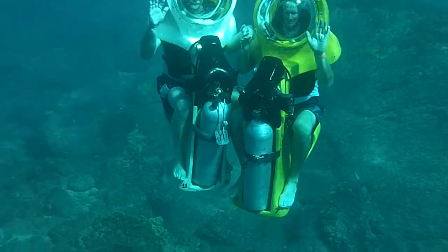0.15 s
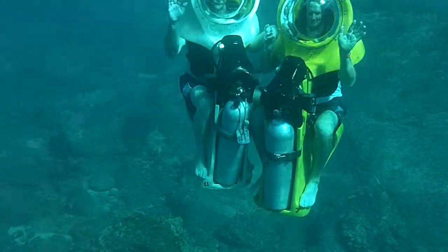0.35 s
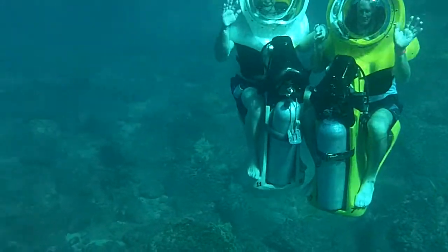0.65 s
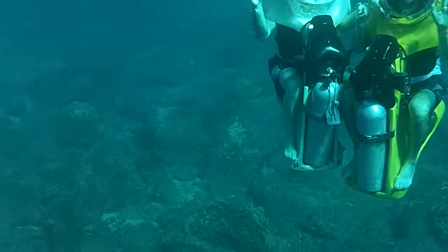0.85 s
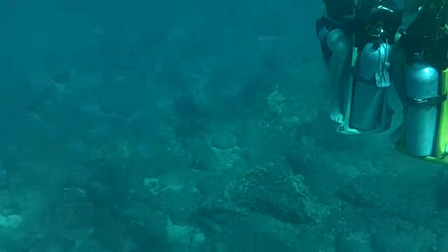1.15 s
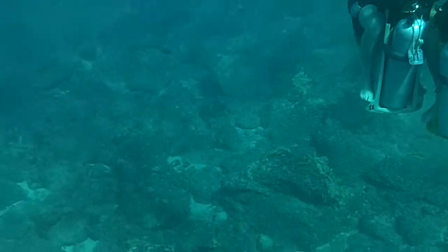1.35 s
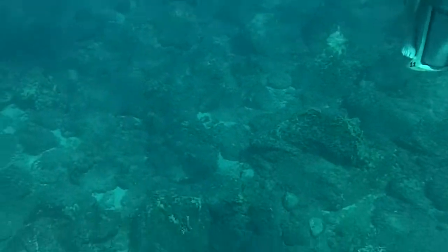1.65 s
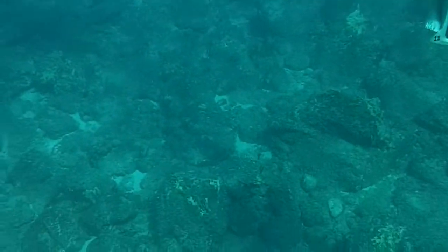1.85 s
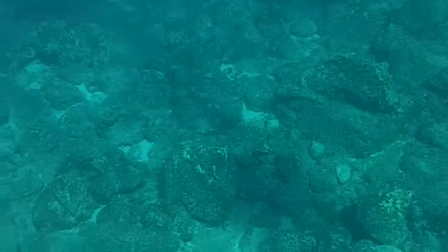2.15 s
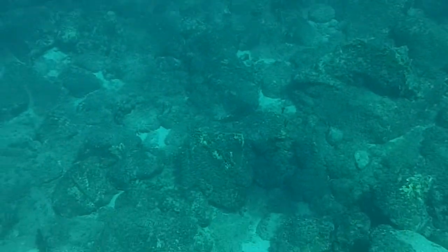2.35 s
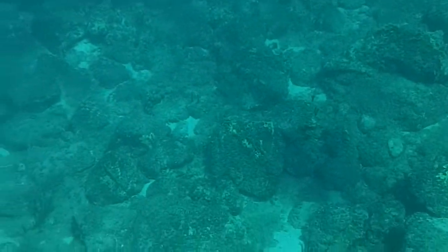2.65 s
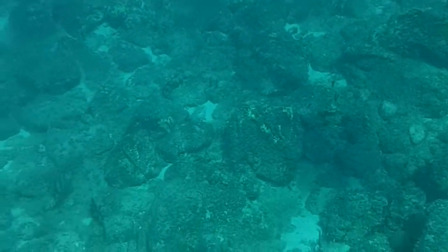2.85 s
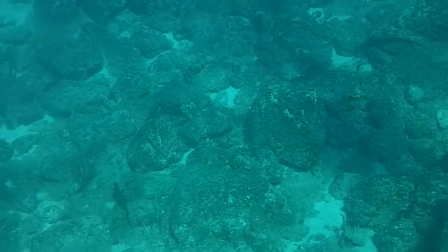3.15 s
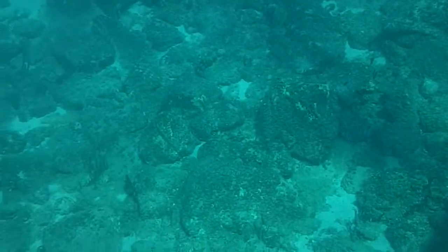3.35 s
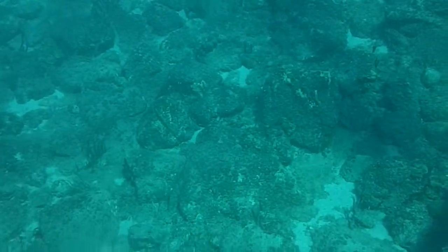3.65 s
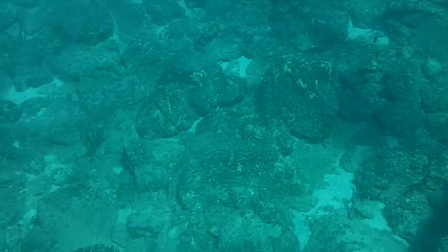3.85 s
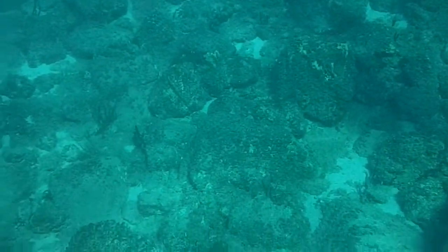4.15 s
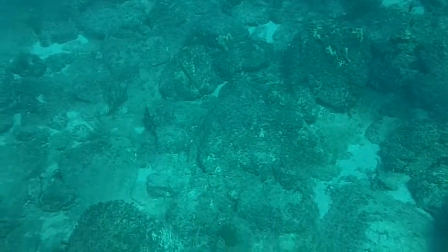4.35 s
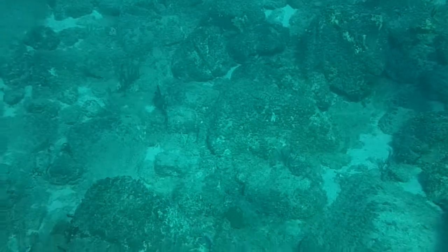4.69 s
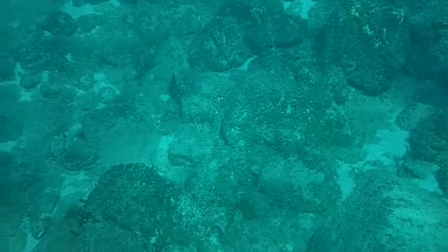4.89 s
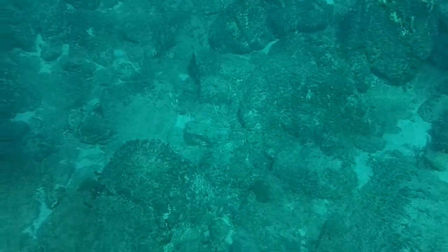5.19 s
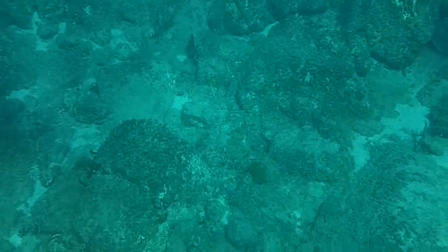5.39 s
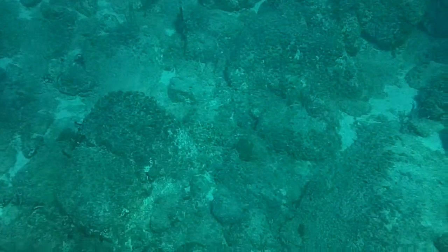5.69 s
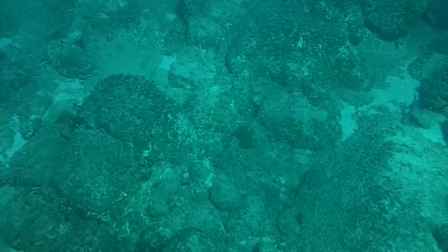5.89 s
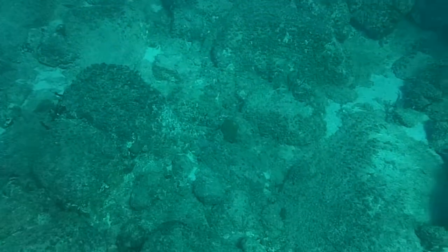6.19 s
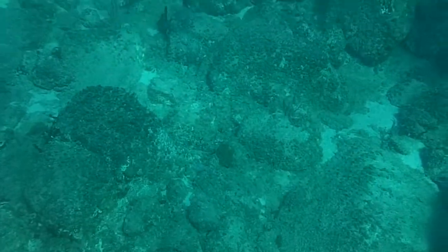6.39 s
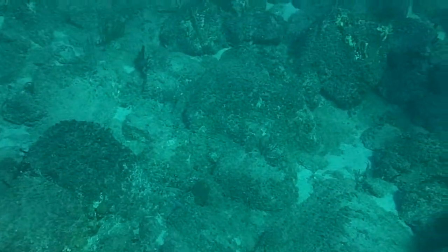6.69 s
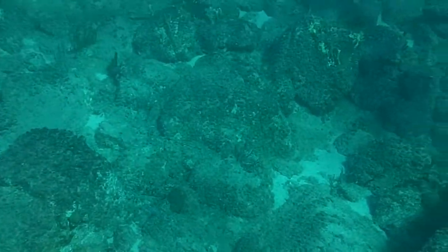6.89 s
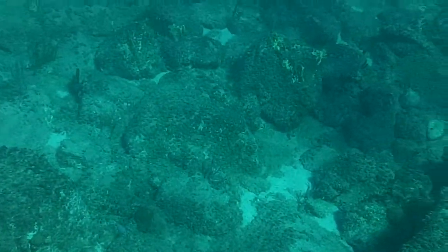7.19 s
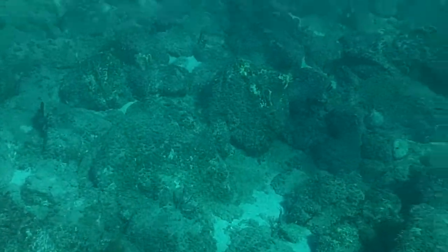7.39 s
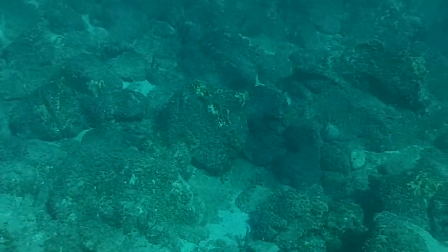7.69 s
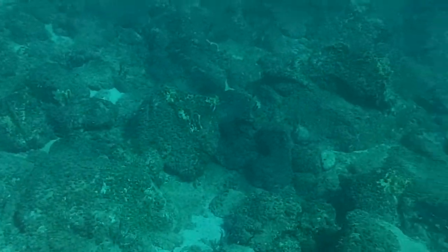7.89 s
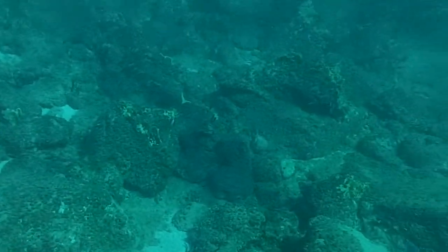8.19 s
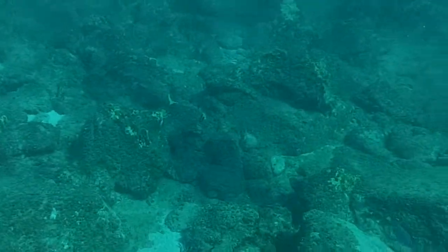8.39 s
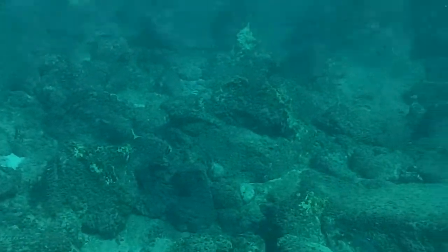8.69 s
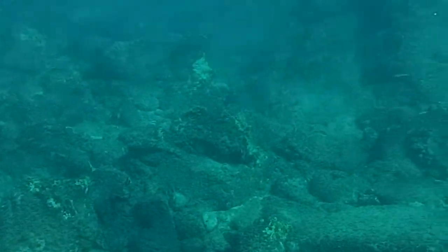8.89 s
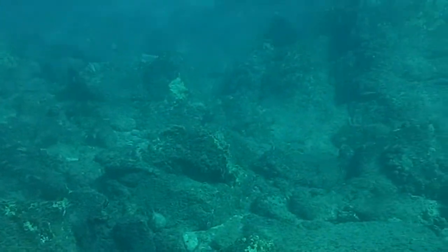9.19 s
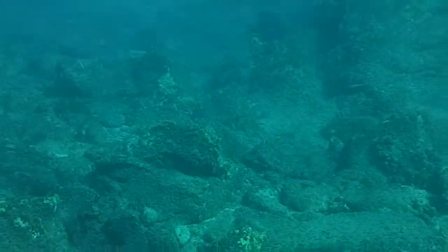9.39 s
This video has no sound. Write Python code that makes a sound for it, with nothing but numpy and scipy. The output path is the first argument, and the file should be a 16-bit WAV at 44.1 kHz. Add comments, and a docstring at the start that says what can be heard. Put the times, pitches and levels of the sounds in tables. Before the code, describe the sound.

Hollow, wavering underwater motor hum around 500 hertz, with a bubbly rush fading early, then dull water knocks, low rumble and tiny bright snaps.

```python
"""Underwater scooters leaving a sinking camera

Underwater scooters pass a camera and move off while the camera sinks towards a reef.
Propeller wash drives a hollow resonance near 500 Hz, probably trapped air that stiffens and rises with depth.
Filtered noise rumbles, rushes and slaps; swelling tones make the bubbles, the knocks' ring and the reef ticks.
A faint crackle rides on the larger swings, with many bright decaying snaps.
A peak limiter and a quick gain control hold the level, so the hum dips after loud knocks."""
import sys
import numpy as np
from scipy import signal
from scipy.fft import rfft, irfft, next_fast_len
from scipy.io import wavfile
from scipy.ndimage import uniform_filter1d

SR = 44100
rng = np.random.default_rng(int(sys.argv[2]) if len(sys.argv) > 2 else 0)


def store_pcm(level_fs):
    """Save levels as 16-bit WAV."""
    pcm = np.round(np.clip(level_fs, -1, 1) * 32767).astype(np.int16)
    wavfile.write(sys.argv[1], SR, np.atleast_2d(pcm).T)


N = 420713
TIME = np.arange(N) / SR  # seconds

# Base pitch of the hollow, rising overall as the camera sinks. Each row: time in seconds, pitch in Hz.
HOLLOW_PITCH = [(0, 432.7), (1.8, 435.7), (3, 456.3), (4, 464.6), (5.2, 471), (6.2, 484.2), (7.2, 488.4),
                (7.9, 502), (8.3, 492.9), (9.54, 495)]
# How unevenly the wash drives the hum. Each row: time in seconds, depth of the lumps in dB.
LUMPINESS_OF_WASH = [(0, 1.5), (1.2, 3), (2.6, 3), (5.6, 7), (6.6, 0.03), (9.54, 3)]
# The scooters' wake settles. Each row: time in seconds, gurgle level in dB, slap level in dB.
WAKE_LEVELS = [(0, -30.5, -24), (2.4, -30.5, -26), (3, -31.5, -32.5), (3.6, -34.5, -27), (4.3, -38.5, -33),
               (5.6, -33.5, -28), (6, -37.5, -35), (7.3, -36.5, -32.5), (8, -37.5, -36.5),
               (9.54, -33, -38.5)]


def gain_of(db):
    """Decibels to amplitude."""
    return 10 ** (np.asarray(db) / 20)


def evened(x):
    """Scales to rms 1."""
    return x / np.sqrt(np.mean(x ** 2) + 1e-20)


def steadied(x, size=5000):
    """Holds the running rms near 1 over size samples and keeps the quick flutter."""
    power = uniform_filter1d(uniform_filter1d(x ** 2, size), size // 2)
    return x / np.sqrt(abs(power) + 1e-20)


def curve(rows):
    """Each column of a table of times, drawn out over every sample."""
    s, *columns = np.transpose(rows)
    return [np.interp(TIME, s, column) for column in columns]


def coloured(x, colour):
    """Filters by a list of (Hz, dB) points, joined on a logarithmic frequency axis."""
    hz, db = np.transpose(colour)
    size = next_fast_len(N + 4096)
    f = np.fft.rfftfreq(size, 1 / SR)
    gain = gain_of(np.interp(np.log(f + 1), np.log(hz + 1), db))
    return irfft(rfft(x, size) * gain, size)[:N]


def wander(per_s, size=16384):
    """Smooth random motion of rms 1: noise that falls off steeply above per_s cycles a second."""
    f = np.arange(size // 2 + 1) / TIME[-1]
    slow = irfft(rfft(rng.standard_normal(size)) / np.maximum(f / per_s, 1) ** 5)
    return np.interp(TIME, np.linspace(0, TIME[-1], size), evened(slow))


def swelling(depth_db, per_s):
    """A gain that swells and sinks at random."""
    return gain_of(depth_db * wander(per_s))


def churn(lumpy_db, per_s):
    """Turbulent pressure: noise that comes in lumps."""
    return rng.standard_normal(N) * swelling(lumpy_db, per_s)


def resonate(x, hz, width, order=5):
    """A steep-sided resonance of gain 1 that follows the curve hz: shift down, smooth, shift back."""
    turn = np.exp(2j * np.pi * np.cumsum(hz) / SR)
    r = np.exp(-np.pi * width / SR)
    smooth = signal.sosfilt([[1 - r, 0, 0, 1, -r, 0]] * order, x / turn)
    return 2 * (turn * smooth).real


def add(mix, s, sound):
    """Mixes a sound in at time s."""
    part = mix[max(round(s * SR), 0):][:len(sound)]
    part += sound[:len(part)]


def ping(hz, swell_s, glide=0):
    """A tone that swells for swell_s and dies; glide is its rise in pitch per swell time."""
    u = np.arange(0, 10, 1 / (SR * swell_s))
    return u * np.exp(1 - u) * np.sin(2 * np.pi * np.cumsum(hz * (1 + glide * u)) / SR)


def bubbling(per_s, low_hz, high_hz, cycles, count=20):
    """A random cloud of small bubbles in count sizes, each swelling for a few cycles."""
    out = np.zeros(N)
    for hz in np.geomspace(low_hz, high_hz, count):
        births = (rng.random(N) < per_s / count / SR).astype(float)
        out += signal.oaconvolve(births, ping(hz, cycles / hz, glide=0.029))[:N]
    return evened(out)


def spells(rows, rise_s, fade_s):
    """A gain that rises, holds and fades for each row of (start, length, dB)."""
    total = 0
    for s, length, db in rows:
        rise = np.clip((TIME - s) / rise_s, 0, 1)
        fade = np.exp(-np.maximum(TIME - s - length, 0) / fade_s)
        total = total + gain_of(db) * rise * fade
    return total


def drive():
    """Strength of the propeller wash at the hollow: it throbs unevenly, up to about ten times a second."""
    # Steady strength of the hum. Each row: time in seconds, level in dB.
    hum_levels = [(0, -17.5), (1.05, -14.5), (1.2, -22.5), (1.75, -27), (2.3, -19), (2.95, -18),
                  (3.15, -25), (3.4, -18), (5.6, -17.5), (6.4, -19), (7.7, -15), (9.54, -19.5)]
    throbs_per_s, throb_share = 9.96, .7  # the throb's depth is this share of the lumpiness
    level_db, = curve(hum_levels)
    lumpy_db, = curve(LUMPINESS_OF_WASH)
    throb = np.minimum(wander(throbs_per_s), 0.9)
    return gain_of(level_db + throb_share * lumpy_db * throb)


def wash_gusts():
    """Gusts of wash, as gains that make the hum swell."""
    # Each row: start in seconds, length in seconds, level in dB.
    gust_rows = [(.123, 0.022, -17), (.27, .015, -22), (.435, .014, -15.5), (.709, .02, -13),
                 (.81, 0.027, -13), (.932, .025, -15), (1.915, 0.017, -13.5), (1.968, 0.035, -12.5),
                 (2.022, 0.021, -12), (2.65, 0.016, -11.5), (2.755, 0.018, -17.5), (2.851, .014, -10),
                 (2.9, .016, -13), (3.008, 0.046, -11.5), (3.228, 0.019, -13), (3.34, 0.012, -10),
                 (3.437, .04, -13), (3.503, 0.017, -10.5), (3.62, 0.073, -17), (3.78, 0.018, -5),
                 (3.931, 0.01, -14.5), (3.965, .036, -13.5), (4.055, 0.029, -13), (4.32, 0.032, -11),
                 (4.486, .018, -12), (4.568, .018, -11.5), (4.629, .012, -9), (4.757, .032, -11),
                 (4.861, 0.015, -10), (4.968, 0.034, -16.5), (5.04, .036, -13), (5.272, .028, -13),
                 (5.392, 0.028, -18), (5.807, 0.087, -7.5), (5.996, .01, -11), (6.125, .016, -12),
                 (6.16, .032, -11.5), (6.283, .014, -12.5), (6.435, .015, -15), (6.547, .026, -11),
                 (6.675, 0.016, -12), (6.875, 0.038, -15.5), (6.977, 0.014, -11.5), (7.089, 0.014, -10.5),
                 (7.14, .03, -15), (7.192, .014, -12), (7.31, 0.012, -10.5), (7.448, .014, -12),
                 (7.594, 0.027, -12), (7.667, .01, -10.5), (7.766, 0.013, -12.5), (7.822, .054, -15.5),
                 (7.889, .014, -8), (8.018, 0.0063, -13), (8.157, .014, -16.5), (8.202, .01, -11),
                 (8.438, 0.029, -12), (8.522, .028, -10.5), (8.63, .012, -13), (8.751, .016, -9.5),
                 (8.82, .016, -13), (8.868, .014, -14), (8.936, .034, -14.5), (9.166, .02, -16.5),
                 (9.222, 0.02, -14.5), (9.342, .012, -12.5), (9.402, .014, -13)]
    return spells(gust_rows, rise_s=0.0079, fade_s=0.011)


def hum(strength, gusts):
    """Lumps of wash drive the modes of the hollow, which drift; gusts ring it clearly, up to its full swing."""
    # The main modes. Each row: multiple of the base pitch, width in Hz, level in dB.
    main_modes = [(1.03, 80, 4), (.97, 78, -3), (.89, 113.5, -6), (.79, 168, -14)]
    # A weaker upper mode that sinks towards the main ones late on.
    # Each row: time in seconds, multiple of the base pitch, level in dB.
    upper_mode = [(0, 1.4, -15.5), (1.5, 1.36, -12.5), (3, 1.32, -19.5), (4, 1.34, -14.5), (5.2, 1.36, -17),
                  (7.3, 1.35, -15.5), (7.9, 1.16, -12.5), (9.54, 1.16, -7)]
    # A faint top mode that comes out late on, with the same columns.
    top_mode = [(0, 1.8, -32.5), (2.5, 1.7, -35.5), (6, 1.65, -37), (7.9, 1.52, -28), (9.54, 1.52, -27.5)]
    steady_s = 0.051  # the hum evens out over this time
    gust_pitch, gust_waver = 1.022, .022  # multiple of the base pitch, and the share by which it wavers
    gust_beat_db = 2.5  # the gust tone beats at random by this much
    full_swing_db = -4.5  # the hollow swings no further, so strong gusts have flat tops

    pitch_hz, = curve(HOLLOW_PITCH)
    lumpy_db, = curve(LUMPINESS_OF_WASH)
    lumps = swelling(lumpy_db, per_s=61)
    ring = np.zeros(N)
    for mode in (upper_mode, top_mode):
        multiple, db = curve(mode)
        ring += gain_of(db) * resonate(lumps * rng.standard_normal(N), pitch_hz * multiple, width=120)
    for multiple, width, db in main_modes:
        ring += gain_of(db) * resonate(lumps * rng.standard_normal(N), pitch_hz * multiple, width)
    ring = strength * steadied(ring, size=round(steady_s * SR))

    gust_hz = pitch_hz * gust_pitch * (1 + gust_waver * wander(per_s=25))
    tone = np.sqrt(2) * np.sin(2 * np.pi * np.cumsum(gust_hz) / SR)
    # the clear tone takes over from the noisy ring during a gust
    ring = ring * strength / np.hypot(strength, gusts)
    ring += gusts * tone * swelling(gust_beat_db, per_s=32)
    swing = abs(signal.hilbert(ring, next_fast_len(N)))[:N] / gain_of(full_swing_db)
    return ring / (1 + swing ** 4) ** .25


def wash(strength):
    """The dull distant wash of the propellers: lumpy noise, swelling with the hum."""
    # Each row: frequency in Hz, level in dB.
    wash_colour = [(500, -22.5), (705, -8.5), (780, -4), (870, -4), (990, -1.5), (1120, -13), (1250, -29.5),
                   (1900, -21), (2500, -40.5), (2800, -68)]
    wash_db = -33.5  # relative to the strength of the hum
    noise = coloured(churn(lumpy_db=5.0, per_s=41), wash_colour)
    return gain_of(wash_db) * strength * steadied(noise)


def propellers():
    """A bright bubbly rush, noise mixed with small bubbles, that fades as the scooters leave."""
    # The propellers pass and leave. Each row: time in seconds, level in dB.
    rush_levels = [(0, -18), (.25, -27.5), (.43, -20.5), (.52, -26.5), (.62, -23), (.8, -20.5), (1.03, -22),
                   (1.25, -32), (1.45, -33), (1.56, -25), (1.65, -37.5), (2.3, -41), (2.9, -81)]
    # Each row: frequency in Hz, level in dB.
    rush_colour = [(150, -29.5), (300, -8.5), (400, 3.5), (535, -9), (615, 3.5), (700, -11.5), (780, -6.5),
                   (900, -15.5), (1110, -17.5), (1260, -35.5), (1450, -26), (1700, -25), (2000, -43.5),
                   (2730, -71.5), (3050, -46), (4800, -66), (5500, -75)]
    rush_db, = curve(rush_levels)
    froth = evened(churn(lumpy_db=1.5, per_s=71))
    froth += gain_of(-15.5) * bubbling(per_s=63, low_hz=619, high_hz=1810, cycles=3.6)
    flutter = swelling(depth_db=1.56, per_s=8.6)
    return gain_of(rush_db) * flutter * steadied(coloured(froth, rush_colour))


def flow():
    """The current surges and rumbles on the housing in eddies of low noise."""
    # Strength of the current. Each row: time in seconds, deep surge in dB, rumble in dB.
    current_levels = [(0, -27, -39), (1.03, -21, -29.5), (1.12, -18.5, -25.5), (1.6, -28.5, -18.5),
                      (3.1, -19, -28.5), (4.5, -22, -27), (5.8, -21.5, -25), (6.6, -21.5, -22),
                      (8, -27, -23.5), (8.6, -22, -22.5), (9.4, -17, -21.5)]
    # Deep surge. Each row: frequency in Hz, level in dB.
    surge_colour = [(4, -12.5), (13, -5.5), (34, 1), (50, -5), (70, -7.5), (150, -36.5), (500, -97)]
    # Rumble, with the same columns.
    rumble_colour = [(30, -23.5), (55, -4), (80, -0.5), (105, -4), (130, -14), (200, -30.5), (600, -88.5)]
    surge_db, rumble_db = curve(current_levels)
    surge = steadied(coloured(rng.standard_normal(N), surge_colour), size=7000)
    rumble = steadied(coloured(churn(lumpy_db=1.0, per_s=5.1), rumble_colour))
    eddies = swelling(depth_db=2.5, per_s=6.9)
    return eddies * (gain_of(surge_db) * surge + gain_of(rumble_db) * rumble)


def gurgle():
    """Bubbles gurgle softly in the wake, and loudly when a cloud of them drifts past."""
    # Clouds of bubbles. Each row: start in seconds, length in seconds, level in dB.
    cloud_rows = [(.01, .2, -28.5), (1.08, .8, -20), (2.1, 0.39, -25), (2.65, 0.14, -28),
                  (6.18, 0.43, -23.5), (6.94, 0.037, -17.5), (9.4, 0.03, -21.5)]
    # Each row: frequency in Hz, level in dB.
    gurgle_colour = [(70, -12), (120, 4.5), (160, 3), (210, -4.5), (260, -19.5), (400, -33), (900, -82)]
    wake_db, _ = curve(WAKE_LEVELS)
    level = gain_of(wake_db) * swelling(depth_db=2.5, per_s=20)
    level += spells(cloud_rows, rise_s=0.09, fade_s=0.05)
    cloud = evened(churn(lumpy_db=8.5, per_s=45))
    cloud += gain_of(-24.5) * bubbling(per_s=32, low_hz=118.0, high_hz=275, cycles=1.1)
    return level * steadied(coloured(cloud, gurgle_colour), size=7000)


def slap():
    """Irregular soft slaps of water on the housing, lumpy low noise dying down with the wake."""
    # Each row: frequency in Hz, level in dB.
    slap_colour = [(150, -16), (225, 2), (300, 2.5), (370, 3.5), (440, -13.5), (560, -42), (900, -85)]
    _, level_db = curve(WAKE_LEVELS)
    slaps = steadied(coloured(churn(lumpy_db=4.5, per_s=44), slap_colour), size=7000)
    return gain_of(level_db) * swelling(depth_db=3.5, per_s=4.4) * slaps


def fizz():
    """Far small bubbles fizz evenly behind everything."""
    # Each row: time in seconds, level in dB.
    fizz_levels = [(0, -63), (2.5, -64.5), (3.8, -58.5), (4.6, -59.5), (6, -63), (8, -63.5), (9.54, -63)]
    # Each row: frequency in Hz, level in dB.
    fizz_colour = [(500, -26.5), (750, -1.5), (1050, -0.5), (1400, -1.5), (1900, -9), (2400, -11),
                   (2730, -35.5), (3100, -21.5), (4900, -24), (5500, -43.5)]
    level_db, = curve(fizz_levels)
    froth = rng.standard_normal(N)
    froth += gain_of(-15.5) * bubbling(per_s=41, low_hz=850, high_hz=1900, cycles=3.1, count=10)
    return gain_of(level_db) * evened(coloured(froth, fizz_colour))


def hiss():
    """Spells of thin grainy hiss, strongest between 2 and 2.3 kHz, that come quickly and die away."""
    # Each row: start in seconds, length in seconds, level in dB.
    hiss_rows = [(0, .16, -54), (3.92, .42, -58.5), (6.05, .85, -59.5), (6.95, 0.44, -55),
                 (7.4, .48, -54.5), (9.05, .33, -61)]
    # Each row: frequency in Hz, level in dB.
    hiss_colour = [(700, -14), (1100, -7.5), (1800, -12), (2050, 0.5), (2300, 1), (2480, -3), (2730, -28),
                   (3200, -15), (4900, -25), (5500, -39.5), (13000, -21.5), (15500, -33.5)]
    grain = evened(coloured(churn(lumpy_db=2.0, per_s=220), hiss_colour))
    return spells(hiss_rows, rise_s=0.054, fade_s=0.044) * grain


def crackle(x):
    """Short noise ticks fall on many larger crests of the wave, with a rasp that grows steeply with the swing."""
    # Ticks. Each row: frequency in Hz, level in dB.
    crackle_colour = [(700, 1.5), (1000, 7.5), (1500, 4.5), (2000, 1), (2400, -0.5), (2730, -20.5),
                      (3000, -5), (4950, -8), (5450, -33), (6000, -18.5), (7200, -24), (8200, -37.5),
                      (9500, -23.5), (15500, -27.5)]
    # Rasp, with the same columns.
    rasp_colour = [(600, -3), (1200, -2), (2000, -2), (2400, 3), (2730, -23), (3200, -7.5), (4300, -3),
                   (4850, -3.5), (5450, -24.5), (6500, -22), (8200, -26), (9600, -7), (11000, -24.5),
                   (12000, -12.5), (13200, -18.5), (14400, -9), (15500, -19.5)]
    crackle_db, floor_db = -52.5, -29.5  # ticks; even fizz between them, relative to them
    from_swing, full_swing = 0.097, 0.45  # ticks begin at the first and grow no larger above the second
    crest_share, scatter_db = .36, 2  # share of the crests that may tick, and the scatter of their sizes
    tick_s = .0004  # half length of a tick
    rasp_db, rasp_steepness = -38, 2.1  # level for a swing of 1, and power of the swing

    swing = abs(x)
    crest = (swing > np.roll(swing, 1)) & (swing >= np.roll(swing, -1))
    crest &= rng.random(N) < crest_share
    scatter = gain_of(scatter_db * np.clip(rng.standard_normal(N), -2, 2))
    sizes = crest * np.maximum(np.minimum(swing, full_swing) - from_swing, 0) * scatter
    tick = np.exp(-(np.arange(-128, 129) / SR / tick_s) ** 2)
    envelope = np.hypot(evened(signal.oaconvolve(sizes, tick, "same")), gain_of(floor_db))
    ticks = evened(coloured(envelope * rng.standard_normal(N), crackle_colour))

    grit = rng.standard_normal(N)
    rasp = coloured(np.minimum(swing, .85) ** rasp_steepness * grit, rasp_colour)
    rasp /= np.std(coloured(grit, rasp_colour))
    return gain_of(crackle_db) * ticks + gain_of(rasp_db) * rasp


def bubbles():
    """Single large bubbles ring and rise in pitch as they break free."""
    # Each row: start in seconds, starting pitch in Hz, level in dB, swell time in seconds.
    bubble_rows = [(0.062, 590, -15.5, 0.0053), (0.139, 332.7, -7, 0.0079), (0.143, 787, -21, 0.013),
                   (0.23, 592, -13.5, 0.012), (0.458, 301, -3, 0.0059), (0.712, 670, -19.5, 0.0075),
                   (0.806, 622, -20.5, 0.011), (1.018, 718, -20.5, 0.0049), (1.305, 327, -6, 0.0046),
                   (1.38, 578, -15.5, 0.013), (1.56, 846, -27, 0.0063), (1.721, 152.7, -26.5, 0.0071),
                   (1.77, 198.4, -20.5, 0.012), (1.868, 376, -13.5, 0.0092), (2.174, 207.8, -12.5, 0.019),
                   (2.281, 157, -16, 0.023), (2.358, 357, -11.5, 0.018), (5.264, 633.5, -21.5, 0.0077),
                   (6.323, 218.2, -13, 0.0072), (6.46, 192.7, -18, 0.016), (6.596, 144.7, -22.5, 0.0064),
                   (6.953, 144.5, -14.5, 0.012)]
    out = np.zeros(N)
    for s, hz, db, swell_s in bubble_rows:
        add(out, s, gain_of(db) * ping(hz, swell_s, glide=0.016))
    return out


def snaps():
    """Sharp bright snaps, many of them on knocks, each ringing a few short, nearly evenly spaced modes."""
    # Each row: start in seconds, level in dB before the common lift.
    snap_rows = [(0.4638, -44), (1.1039, -41), (1.1527, -42), (1.2273, -34), (1.2476, -43.5), (1.2965, -45),
                 (1.3997, -41), (1.405, -49), (1.466, -53), (1.496, -40), (1.5684, -48), (1.5908, -40),
                 (1.6706, -43), (1.6935, -44), (1.736, -43), (1.7799, -50), (2.1603, -39), (2.291, -44),
                 (2.3984, -42.5), (2.606, -43.5), (2.7504, -40), (2.97, -44), (3.017, -40.5), (3.1413, -43),
                 (3.2824, -42), (3.7512, -40), (3.856, -40), (4.2193, -35.5), (4.7611, -44), (5.1248, -44),
                 (5.4795, -41), (5.6371, -38), (6.0337, -37.5), (8.335, -47), (8.3878, -43)]
    # What each snap rings with. Each row: centre pitch in Hz, level in dB, time to fall 60 dB in seconds.
    snap_modes = [(2240, 0.5, .009), (4670, -3.5, 0.0094), (7050, -18, .005), (9400, -14, .006),
                  (12000, -13, .006), (14400, -14, .006)]
    lift_db, rise_s = 5, 0.00099  # common lift and attack
    scatter = .015  # scales the random detuning of the modes from snap to snap
    out, t = np.zeros(N), np.arange(1024) / SR
    for s, level_db in snap_rows:
        ring = np.zeros(len(t))
        for hz, db, t60 in snap_modes:
            detuned_hz = hz * (1 + scatter * rng.uniform(-1.2, 1))
            ring += gain_of(db - 60 * t / t60) * np.sin(2 * np.pi * detuned_hz * t)
        add(out, s, gain_of(level_db + lift_db) * np.minimum(t / rise_s, 1) * ring)
    return out


def squeal():
    """A thin fuzzy whistle, noise through a narrow falling resonance, slides down through the rush."""
    # Start in seconds, length in seconds, first pitch in Hz, last pitch in Hz, level in dB.
    squeal_row = (.615, .115, 1150, 820, -38)
    s, length, from_hz, to_hz, db = squeal_row
    slide_hz = np.interp(TIME, [s, s + length], [from_hz, to_hz])
    whistle = resonate(rng.standard_normal(N), slide_hz, width=31)
    return spells([(s, length, db)], rise_s=0.014, fade_s=.01) * steadied(whistle, size=1500)


def reef():
    """Sparse short ticks from the reef, each a brief ping."""
    # Each row: start in seconds, pitch in Hz, level in dB.
    tick_rows = [(1.02, 8910, -53), (1.225, 7390, -68), (1.398, 9630, -57), (3.892, 1000, -28.5),
                 (3.939, 2326, -35), (4.566, 8900, -64), (5.689, 3050, -49), (7.317, 988, -31.5),
                 (8.019, 970, -39)]
    out = np.zeros(N)
    for s, hz, db in tick_rows:
        add(out, s, gain_of(db) * ping(hz, swell_s=0.002))
    return out


def knocks():
    """Water knocks on the housing: a push with a slow rebound and a dull clunk, which rings the hollow."""
    # Each row: start in seconds, thump level in dB, thump pitch in Hz, level of the hollow's ring in dB.
    knock_rows = [(1.102, -1, 63.1, -27.5), (1.151, 1, 96.2, -21), (1.226, 7.5, 99.2, -10.5),
                  (1.248, -11, 110.5, -22.5), (1.399, 3, 153.3, 1.5), (1.465, -5, 102.7, -21),
                  (1.496, -6.5, 112.4, -14), (1.566, -21.5, 186, -6.5), (1.666, -9, 194.4, -10),
                  (1.736, -4, 99, -22), (2.11, -13, 97, -10), (2.16, -4.5, 106, -13),
                  (2.283, -9.5, 119.9, -11), (2.398, -5, 74, -17.5), (2.511, -16, 141, -10.5),
                  (2.605, -7, 140.3, -6.5), (2.749, -4.5, 141.4, -9.5), (2.969, -5, 98.4, -18),
                  (3.014, -14.5, 64.8, -9), (3.115, -4, 121, -23.5), (3.277, -9, 87.8, 0),
                  (3.388, -9.5, 130.6, -19.5), (3.623, -12, 170.5, -16.5), (3.751, -3.5, 141.3, -9),
                  (3.857, -1, 158, -8), (4.216, -1.5, 67.7, -17.5), (4.372, -7, 88.8, -15.5),
                  (4.762, -2, 114.6, -9), (4.973, -10.5, 75.8, -15), (5.124, -11.5, 114.6, -18),
                  (5.163, -19.5, 71.6, -13.5), (5.282, -22.5, 112.8, -14), (5.477, -6.5, 78.6, -18),
                  (5.586, -14, 96.7, -5.5), (5.637, -3.5, 91.2, -6), (5.739, -10.5, 166, -7.5),
                  (6.031, 9, 63.1, -18), (6.212, -5, 193.8, -16), (6.609, -8.5, 120.6, -10),
                  (6.96, -6, 138.6, -22.5), (8.335, -8.5, 95, -22.5), (8.378, -16, 90, -14),
                  (8.755, -24, 92.4, -10.5), (9.01, -29, 82.7, -8), (9.375, -8.5, 91.1, -20),
                  (9.412, -5, 60.4, -11.5), (9.439, -1.5, 156, -18)]
    out, t = np.zeros(N), np.arange(4096) / SR
    for s, thump_db, thump_hz, ring_db in knock_rows:
        u = 2 * np.pi * thump_hz * t
        push = u ** 2 * (3 - u) * np.exp(-u)
        sign = rng.choice([-1, 1])  # pushes in or pulls out
        clunk_db = (thump_db + ring_db) / 2 - 5.5
        hollow_hz = np.interp(s, *np.transpose(HOLLOW_PITCH))
        add(out, s, gain_of(thump_db) * sign * push)
        add(out, s, gain_of(clunk_db) * sign * ping(hz=256, swell_s=0.0014))
        add(out, s, gain_of(ring_db) * ping(hollow_hz, swell_s=0.0038))
    return out


def limited(x):
    """Peak limiter: the hardest peaks push everything down for a moment."""
    ceiling_db, recover_db_per_s = 0, 169
    over_db = np.maximum(20 * np.log10(abs(x) + 1e-9) - ceiling_db, 0)
    fall = recover_db_per_s * TIME
    held_db = np.maximum.accumulate(over_db + fall) - fall
    return x / gain_of(uniform_filter1d(held_db, size=90))


def ducked(x):
    """Quick gain control: the whole sound dips after each loud knock or swell, then recovers."""
    threshold_db, share = -16.5, 0.65  # share of the excess that it removes
    sense_s, recover_db_per_s = 0.013, 72.5  # how quickly it reacts and recovers
    r = np.exp(-1 / (sense_s * SR))
    power_db = 10 * np.log10(signal.lfilter([1 - r], [1, -r], x ** 2) + 1e-12)
    fall = recover_db_per_s * TIME
    held_db = np.maximum.accumulate(power_db + fall) - fall
    over_db = np.maximum(held_db - threshold_db, 0)
    return x / gain_of(share * signal.lfilter([1 - r], [1, -r], over_db))


def scene():
    """Everything reaches one microphone through the housing."""
    strength, gusts = drive(), wash_gusts()
    scooters = hum(strength, gusts) + wash(np.hypot(strength, gusts)) + propellers() + squeal()
    water = flow() + gurgle() + slap() + knocks() + bubbles()
    return (scooters + water + reef() + hiss() + fizz())[None]


def record(dry):
    """Peak limiter and gain control, then crackle on the larger swings and snaps, then the band limit."""
    x = ducked(limited(dry[0])) * np.minimum(TIME / .008, 1)  # short fade in
    band_limit = signal.firwin(511, 15700, window=("kaiser", 9), fs=SR)  # low-pass, edge in Hz
    return signal.oaconvolve(x + crackle(x) + snaps(), band_limit, "same")[None]


dry = scene()
out = record(dry)
store_pcm(out)
```